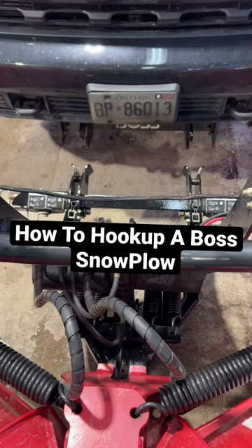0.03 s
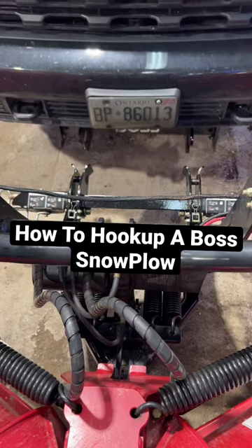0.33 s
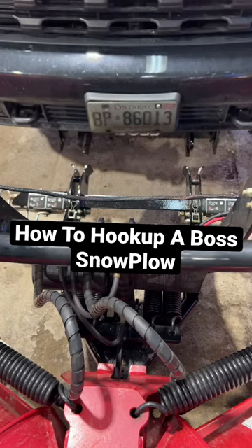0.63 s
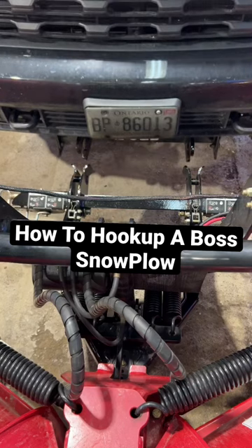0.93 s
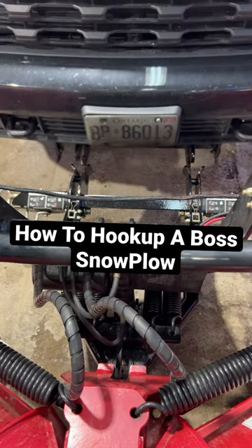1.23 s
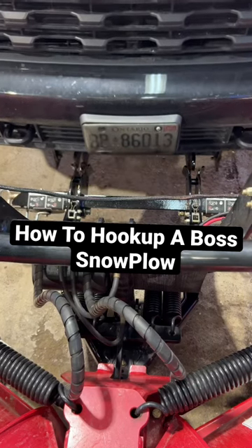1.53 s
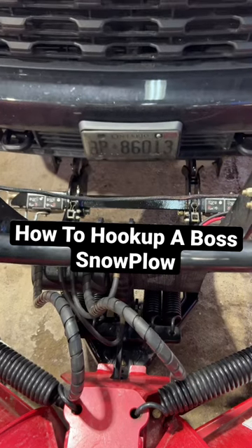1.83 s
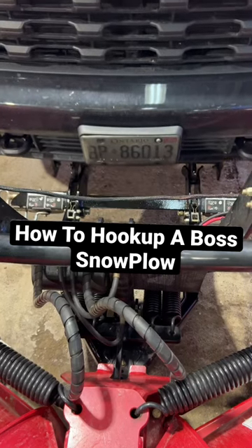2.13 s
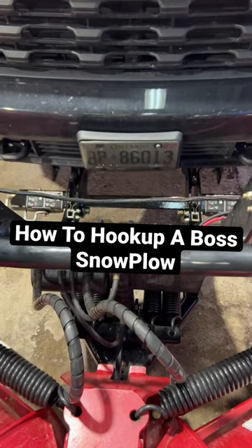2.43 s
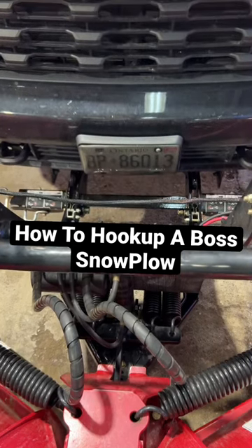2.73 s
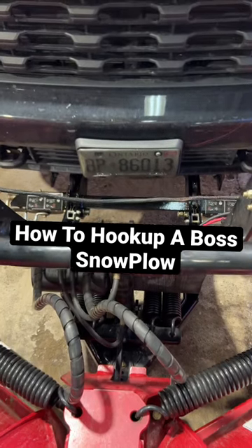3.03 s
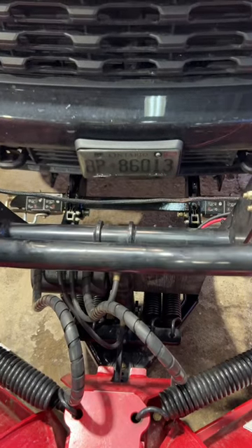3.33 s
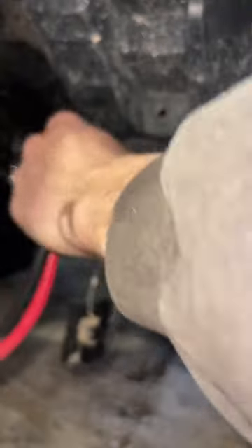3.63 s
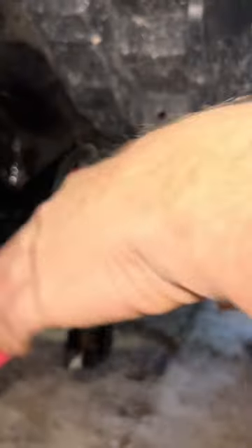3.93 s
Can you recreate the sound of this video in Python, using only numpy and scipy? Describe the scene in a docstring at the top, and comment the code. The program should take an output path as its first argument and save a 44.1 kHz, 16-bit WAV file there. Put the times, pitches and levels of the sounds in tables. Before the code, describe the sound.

A pickup engine rumbles low and unevenly in a workshop, with fan rush and thin whines. Its brackets knock on a steel plough mount at about 1.6 and 2.3 seconds as the growl swells. Near 3 seconds they seat with a loud, rattling clunk and a short, dull echo. At 3.5 seconds the sound cuts to a closer, faster idle with a louder fan and light cable scrapes.

```python
"""A pickup's brackets knock twice on a steel snowplough mount, rub along it and seat with a rattling clunk.
Each blow rings the steel's modes and a short rattle, dully echoed by the workshop. Underneath, the V8
creeps in gear: uneven cylinder thumps and puffs of gas, with fan rush, a low drone and thin whines.
The scene then jumps close to the bumper, where the engine idles faster, the fan is louder
and a cable scrapes."""
import sys
import numpy as np
from scipy import signal
from scipy.fft import rfft, irfft
from scipy.io import wavfile

SR = 44100
rng = np.random.default_rng(int(sys.argv[2]) if len(sys.argv) > 2 else 0)


def master(y):
    """Save y as 16-bit WAV."""
    cut = np.clip(np.atleast_2d(y).T, -1, 1)
    pcm = np.round(cut * 32767)  # scale
    wavfile.write(sys.argv[1], SR, pcm.astype(np.int16))


N = 176400

# Stereo likeness of the engine and the room: frequency_hz, correlation
ROOM_LIKENESS = [(30, 0.85), (90, 0.85), (130, 1), (290, 0.86), (640, 0.22), (1400, -0.3), (3100, 0.11),
                 (15000, 0)]
# Stereo likeness of the steel, scrapes and whines: frequency_hz, correlation
STEEL_LIKENESS = [(150, 0.82), (400, 0.87), (1000, 0.66), (2500, 0.52), (8000, 0.12)]


def amp(db):
    """Decibels to gain."""
    return 10 ** (np.asarray(db) / 20)


def level(x, db):
    """Set the rms level."""
    return x * amp(db) / np.sqrt(np.mean(x ** 2))


def clock():
    """Time of each sample in seconds."""
    return np.arange(N) / SR


def fader(points):
    """Gain that rides through (time_s, level_db) points."""
    return amp(np.interp(clock(), *np.array(points).T))


def bins():
    """Frequency of each spectral bin in Hz."""
    return np.maximum(np.arange(N // 2 + 1) * SR / N, 1)


def curve(points):
    """Read (frequency_hz, value) points on a log-frequency axis."""
    hz, value = np.array(points, float).T
    return np.interp(np.log(bins()), np.log(hz), value)


def shape(x, gain):
    """Filter by a gain per frequency."""
    return irfft(rfft(x) * gain, N)


def band(x, hz, width_hz):
    """Keep one bell-shaped band, at unit level."""
    return level(shape(x, np.exp(-((bins() - hz) / width_hz) ** 2)), 0)


def pan(x, balance):
    """Lean each frequency left or right."""
    return shape(x, amp(np.outer([1, -1], curve(balance)) / 2))


def ring(x, response):
    """Pass a sound through a stereo response."""
    return signal.fftconvolve(np.atleast_2d(x), response, axes=-1)[:, :N]


def noise(likeness):
    """Stereo noise with a given correlation at each frequency."""
    correlation = np.clip(curve(likeness), -.999, .999)
    weights = np.sqrt(np.array([1 + correlation, 1 - correlation]) / 2)
    mid, side = shape(rng.standard_normal((2, N)), weights)
    return np.array([mid + side, mid - side])


def walk(rate_hz):
    """Smooth random drift of unit spread."""
    return level(shape(rng.standard_normal(N), np.exp(-(bins() / rate_hz) ** 2)), 0)


def workshop(x, wet_db=-4, t60_s=.37, damping_hz=3500, predelay_s=.012):
    """Add the workshop's short, dull reverberation."""
    tail = noise(ROOM_LIKENESS) * amp(-60 * clock() / t60_s) * (clock() > predelay_s)
    tail /= np.sqrt(np.mean(np.sum(tail ** 2, axis=-1)))
    dull_tail = shape(tail, 1 / (1 + 1j * bins() / damping_hz))
    return x + amp(wet_db) * ring(x, dull_tail)


def whines():
    """Thin, wavering whines from under the bonnet: narrow bands of noise that fade up."""
    # Whine bands: centre_hz, width_hz, gain_db
    bands = [(2508, 35, -0.5), (3090, 70, -2)]
    # Their shared swell: time_s, level_db
    swell = [(.2, -66), (.5, -56), (1.1, -57.5), (1.55, -60)]
    return fader(swell) * sum(amp(db) * band(noise(STEEL_LIKENESS), hz, width_hz)
                              for hz, width_hz, db in bands)


def rub(strokes):
    """Short, thin hisses of one surface sliding on another."""
    out, hiss = 0, noise(STEEL_LIKENESS)
    for start_s, db, hz, width_hz, decay_s in strokes:
        age = np.maximum(clock() - start_s, 0) / decay_s
        envelope = 2 * np.sqrt(age) * np.exp(-age)
        out = out + amp(db) * band(hiss, hz, width_hz) * envelope
    return out


def cable():
    """A cable scrapes lightly as it is handled by the bumper."""
    # Scrapes: start_s, level_db, centre_hz, width_hz, decay_s
    scrapes = [(3.51, -42, 3400, 500, .016), (3.586, -45, 3500, 180, .014), (3.615, -43, 2600, 900, .012),
               (3.651, -46, 3450, 300, .014), (3.862, -40, 3540, 130, .022),
               (3.928, -42, 4500, 1500, 0.013)]
    return rub(scrapes)


def scuffs():
    """Steel slides on steel in thin, high scuffs, during and just after the clunk."""
    # Scuffs: start_s, level_db, centre_hz, width_hz, decay_s
    strokes = [(2.981, -44, 14200, 900, .012), (2.981, -39.5, 7200, 1500, 0.026),
               (3.287, -48, 9400, 1200, 0.014)]
    return rub(strokes)


def fan(colour, air_db, flutter_db):
    """Rush of the fan and belts, fluttering a little."""
    rush = shape(noise(ROOM_LIKENESS), amp(curve(colour)))
    return level(rush * amp(flutter_db * walk(27)), air_db)


def drone(tones, drift):
    """Tones of the exhaust and engine accessories, drifting together in pitch and wavering in level."""
    drifting_s = np.cumsum(1 + drift * walk(4.57)) / SR
    out = 0
    for hz, db, waver_db in tones:
        tone = np.sin(2 * np.pi * (hz * drifting_s + rng.random()))
        out = out + level(tone * amp(waver_db * walk(11.2)), db)
    return out


def growl():
    """The engine's low growl swells as the truck pushes on the mount."""
    # Swell of the push: time_s, level_db
    push = [(1.2, -53), (1.75, -46), (2.0, -45), (2.3, -34.5), (2.6, -41.5), (3.2, -38.5), (3.45, -43)]
    return band(noise(ROOM_LIKENESS), hz=179, width_hz=67) * fader(push)


def boom(hz, swell, drift):
    """The strongest low tone of the running engine, swelling and sagging."""
    cycles = np.cumsum(hz * (1 + drift * walk(4.8))) / SR
    return level(np.sin(2 * np.pi * cycles), 0) * fader(swell)


def engine(rpm, colour, rumble_db, thump_db, wobble=.005, scatter_db=1, block_ring_s=.07):
    """Eight uneven cylinders thump the block and exhaust; a long puff of gas follows each firing."""
    # Strength of each cylinder, in firing order: gain_db
    cylinders = [-2.5, -3, -4, -3.5, -5, -4, -4, -3.5]
    firing_hz = rpm / 60 * len(cylinders) / 2  # each fires once in two turns
    phase = np.cumsum(firing_hz * (1 + wobble * walk(3))) / SR
    firing = phase.astype(int)
    scatter = scatter_db * rng.standard_normal(N)[firing]
    strength = amp(np.array(cylinders)[firing % len(cylinders)] + scatter)
    block = noise(ROOM_LIKENESS) * np.exp(-clock() / block_ring_s)
    thumps = ring(np.diff(firing, prepend=0) * strength, block)
    gas = noise(ROOM_LIKENESS) * strength * np.exp(-(phase % 1) / 2.7)  # decay in firing intervals
    rumble = level(thumps, thump_db) + level(gas, 0)
    return level(shape(rumble, amp(curve(colour))), rumble_db)


def creeping_truck():
    """The V8 rumbles slowly in gear under a steady low drone."""
    # Colour of the engine rumble: frequency_hz, gain_db
    rumble_eq = [(25, -32), (45, -5.5), (72, 4.5), (110, 1.5), (170, -5), (260, -6), (450, -11.5),
                 (700, -18), (1100, -22), (1700, -23), (3000, -27.5), (6000, -53)]
    # Colour of the fan's rush, with a treble hole near 12 kHz that is not the fan's own:
    # frequency_hz, gain_db
    rush_eq = [(100, -2.5), (500, 6), (1000, 2.5), (1600, -5.5), (3000, -8.5), (4000, -10.5), (5000, -16),
               (6300, -16.5), (7500, -17.5), (9000, -21.5), (12000, -30.5), (14000, -20.5), (16000, -34)]
    # Exhaust and accessory tones: pitch_hz, level_db, waver_db
    tones = [(146.4, -47, 1.5), (181.2, -45, 2), (287.6, -48, 1.5), (441.3, -46.5, 2), (1390, -57, 3)]
    # Swell of the low boom: time_s, level_db
    swell = [(.05, -28), (.85, -27.5), (1.0, -30), (1.4, -26.5), (1.62, -29), (1.68, -36), (1.75, -29.5),
             (2.42, -27), (2.95, -29.5), (3.07, -32), (3.25, -29), (3.45, -26)]
    # Stereo lean of the truck: frequency_hz, left_minus_right_db
    balance = [(90, 0), (200, 2), (400, 1), (1200, 4), (2400, -0.5), (4400, -0.5), (6200, 11), (8200, 8.5),
               (11000, 4), (15000, -3)]
    truck = engine(rpm=533.7, colour=rumble_eq, rumble_db=-32, thump_db=-6)
    truck += fan(rush_eq, air_db=-36.5, flutter_db=.72)
    truck += drone(tones, drift=.00609)
    truck += boom(hz=92.2, swell=swell, drift=.0073) * amp(-.1 * walk(4.9))
    return pan(truck + growl(), balance)


def idling_truck():
    """Close by the bumper, the V8 idles faster with a louder fan and a throbbing boom."""
    # Colour of the engine rumble: frequency_hz, gain_db
    rumble_eq = [(25, -19), (45, -1), (78, -23), (110, 3.5), (150, -7), (220, -8.5), (360, -13.5),
                 (520, -18), (740, -11.5), (900, -25), (1700, -24.5), (6000, -58)]
    # Colour of the rush heard close by: frequency_hz, gain_db
    rush_eq = [(100, -5), (700, 1), (1100, 1.5), (1600, -2.5), (2500, -1.5), (3400, -4.5), (4200, -11),
               (6200, -9.5), (8000, -15), (11000, -16), (13000, -21.5), (16000, -20)]
    # Exhaust and accessory tones: pitch_hz, level_db, waver_db
    tones = [(100.7, -33, 2.6), (146.8, -33.5, 4.8), (164, -37.5, 5.1), (258, -43, 4.5),
             (366.5, -47.5, 2.2), (760, -46.5, 2.1)]
    # Throb of the low boom: time_s, gain_db
    throb = [(3.48, -23), (3.544, -22), (3.59, -26), (3.612, -32), (3.668, -22), (3.746, -17), (3.792, -47),
             (3.808, -30), (3.862, -19.5), (3.89, -42), (3.97, -16.5), (4.0, -36)]
    truck = engine(rpm=776.5, colour=rumble_eq, rumble_db=-29, thump_db=-8.5)
    truck += fan(rush_eq, air_db=-34.5, flutter_db=.7)
    truck += drone(tones, drift=.01)
    return truck + amp(-.5) * boom(hz=77.1, swell=throb, drift=.024)


def strike(blows, modes, rattle_eq, attack_s=.0006, stereo_lag_s=.00007):
    """Each blow rings the steel's modes by where it lands, plus a rattle; softer contacts are duller."""
    size = SR * 2 // 3
    t, out = clock()[:size], np.zeros((2, N))
    lag = np.array([[0], [stereo_lag_s]])
    hz, root_db, tip_db, t60_s = np.array(modes).T
    rings = np.array([np.sin(2 * np.pi * hz[k] * (t + (-1) ** k * lag)) * amp(-60 * t / t60_s[k])
                      for k in range(len(hz))])
    polarity = (-1) ** (np.arange(len(hz)) // 2)
    grit = level(shape(noise(STEEL_LIKENESS), amp(curve(rattle_eq))), 0)
    for k, (start_s, db, brightness_hz, decay_s, place) in enumerate(blows):
        mode_gains = amp(root_db + (tip_db - root_db) * place) * polarity
        tone = np.tensordot(mode_gains, rings, 1)
        fresh_grit = np.roll(grit, k * N // len(blows), axis=1)[:, :size]
        blow = (tone + fresh_grit * np.exp(-t / decay_s)) * (1 - np.exp(-t / attack_s))
        lowpass = signal.butter(2, brightness_hz, fs=SR)
        at = int(start_s * SR)
        out[:, at:at + size] += amp(db) * signal.lfilter(*lowpass, blow)
    return out


def bracket_knocks():
    """The brackets knock and rub as they slide into the guides."""
    # Contacts: start_s, gain_db, brightness_hz, rattle_decay_s, place (0 root to 1 tip)
    knocks = [(1.613, -26.5, 6000, 0.022, 0.89), (1.622, -21, 2600, 0.01, 0.92),
              (1.646, -26.5, 450, 0.025, 0.45), (1.698, -33, 5000, .01, 0.33),
              (1.706, -22.5, 1710, 0.019, 0), (1.736, -27, 1100, 0.018, 0.26),
              (2.245, -27.5, 605, 0.05, 0.46), (2.272, -31.5, 1000, 0.022, 0.76),
              (2.306, -26.5, 450, 0.042, 0.95), (2.358, -34, 700, 0.024, 0.85)]
    # Bracket modes: pitch_hz, struck_at_root_db, struck_at_tip_db, t60_s
    modes = [(294, -20, -3, 0.2), (334.4, -5.5, -7.5, 0.23), (510, -13, -13, 0.28), (767, -5, -10.5, 0.27),
             (1128, -12, -3, 0.088), (1610, -16, -5, 0.079), (1808, -4.5, -20, 0.12),
             (1896, -6, -12, 0.077), (2250, -24, -7, 0.07), (3200, -12, -14, .04)]
    # Colour of the brackets' dense rattle: frequency_hz, gain_db
    rattle_eq = [(80, -27), (200, -3), (350, 4), (600, -2), (1100, -2.5), (1500, -8), (2100, -8.5),
                 (3200, -11), (4500, -27), (12000, -35)]
    return strike(knocks, modes, rattle_eq)


def seating_clunk():
    """The mount seats and jolts the plough frame in a quick cluster of ringing blows."""
    # Blows: start_s, gain_db, brightness_hz, rattle_decay_s, place (0 root to 1 tip)
    blows = [(2.934, -22, 1100, 0.018, 0.21), (2.941, -19, 2000, 0.0088, .3),
             (2.949, -10, 6400, 0.0098, 0.94), (2.961, -18, 3500, 0.0097, .5),
             (2.975, -9, 2250, 0.013, 0.21), (2.982, -17, 6060, 0.031, 0), (2.991, -11, 1000, 0.011, 0.058),
             (3.014, -13.5, 650, 0.008, 0.11), (3.035, -25.5, 1600, 0.047, 0.28),
             (3.072, -17.5, 420, 0.021, 0.31), (3.17, -25.5, 450, 0.014, 0.51)]
    # Plough frame modes: pitch_hz, struck_at_root_db, struck_at_tip_db, t60_s
    modes = [(177, -15, -30, 0.3), (233, -13.5, -17, 0.17), (292.4, -11, -18, 0.3),
             (332.5, -13, -12.5, 0.33), (490, -11, -8, 0.14), (544, -22, -24, 0.26), (750, -10.5, -16, 0.3),
             (974, -14, -1, 0.075), (1065, -11, -7, 0.13), (1136, -25, 0, 0.063), (1207, -11, -19, 0.14),
             (1362, -20, -11, .17), (1628, -17, -13, 0.15), (2046, -17, -9, 0.18), (2510, -20, -6, 0.057),
             (2690, -17, -7.5, 0.074), (2978, -11, -16, 0.21), (3020, -22, -5.5, 0.072),
             (3417, -23, -8, 0.065), (6100, -20, -24, 0.29), (6860, -26, -33, 0.14), (7600, -18, -26, 0.23)]
    # Colour of the frame's dense rattle: frequency_hz, gain_db
    rattle_eq = [(60, -27), (130, -11), (190, -1), (400, 4.5), (750, 0.5), (1100, -2), (1500, -4),
                 (2600, -6.5), (3300, -11), (4200, -14.5), (6000, -20), (8000, -22), (10000, -26),
                 (15000, -34)]
    # Stereo lean of the frame: frequency_hz, left_minus_right_db
    balance = [(300, 1), (700, 2), (1100, 3.5), (2200, 0.5), (3300, -3), (6500, 10), (10000, 3)]
    return pan(strike(blows, modes, rattle_eq), balance)


def scene(start_s=.036, jump_s=3.474):
    """The truck meets the mount; a hard cut then finds it idling close by."""
    t = clock()
    creeping = creeping_truck()
    close_by = idling_truck() + cable()
    steel = bracket_knocks() + seating_clunk()
    coupling = creeping + workshop(steel) + scuffs() + whines()
    return np.where(t < jump_s, coupling, close_by) * (t > start_s)


def record(dry):
    """The phone rounds the loudest peaks and cuts the top."""
    high_cut = signal.ellip(8, .2, 70, 15900, fs=SR, output="sos")
    return signal.sosfilt(high_cut, np.tanh(dry))


dry = scene()
out = record(dry)
master(out)
```